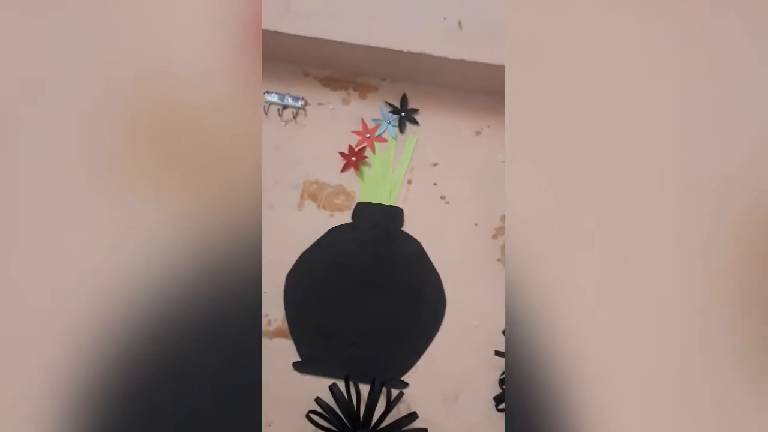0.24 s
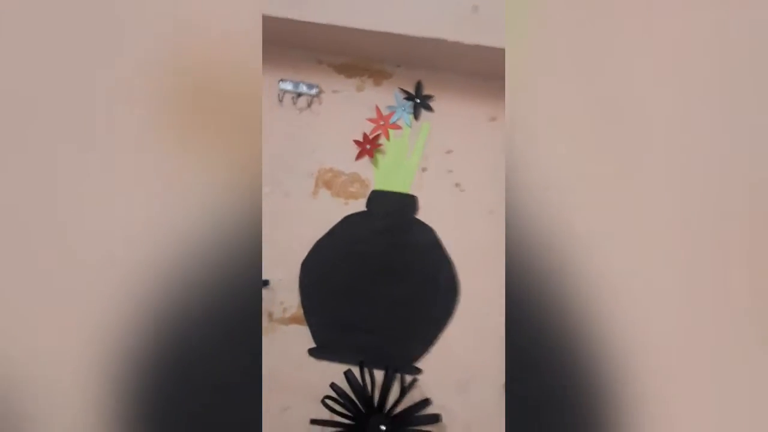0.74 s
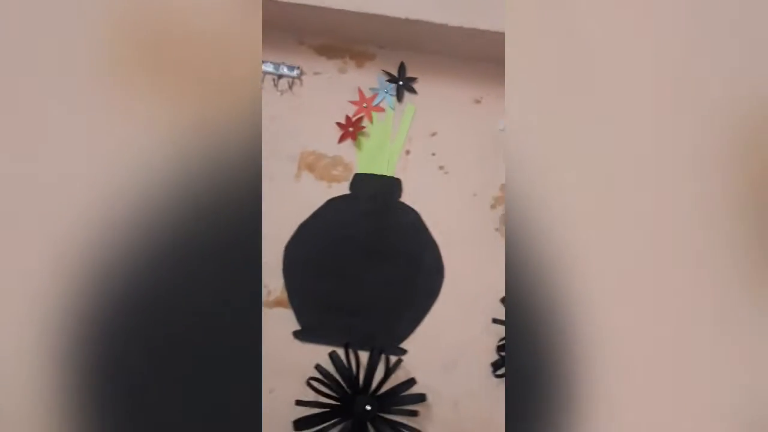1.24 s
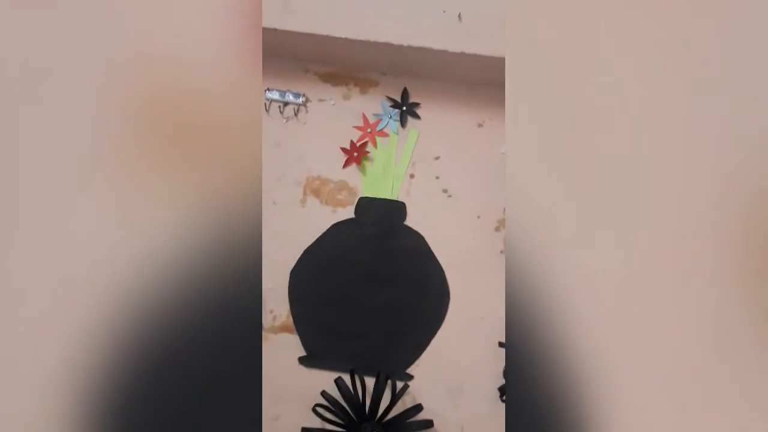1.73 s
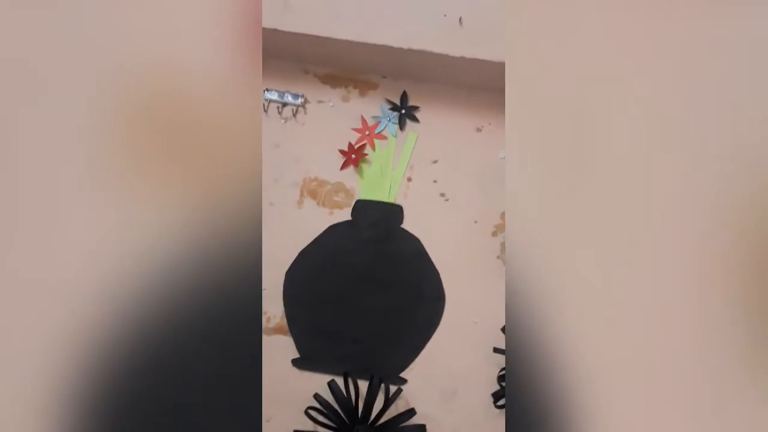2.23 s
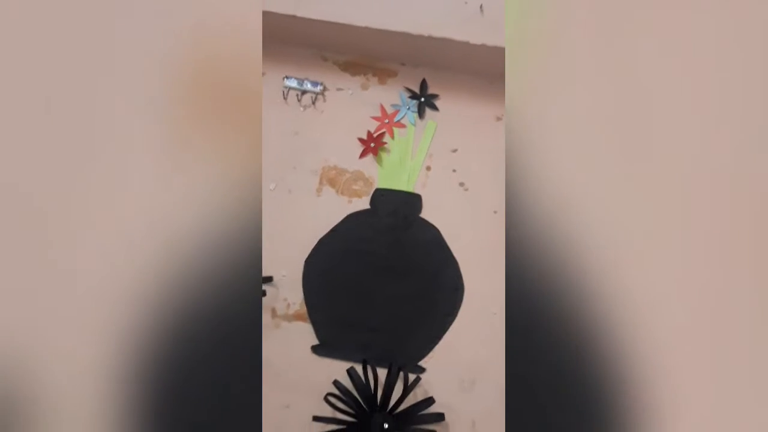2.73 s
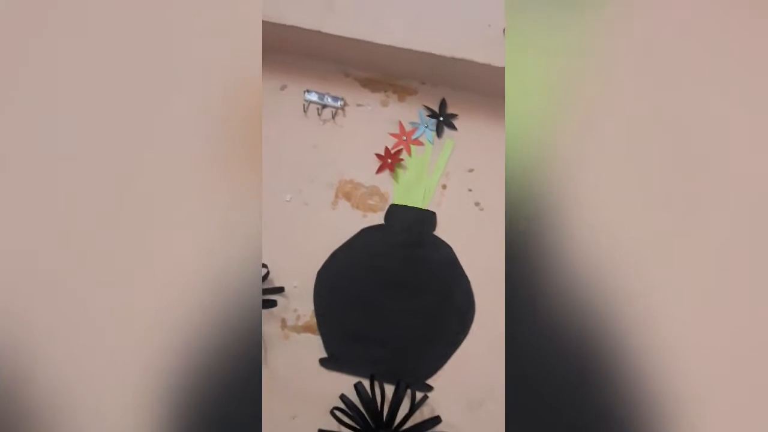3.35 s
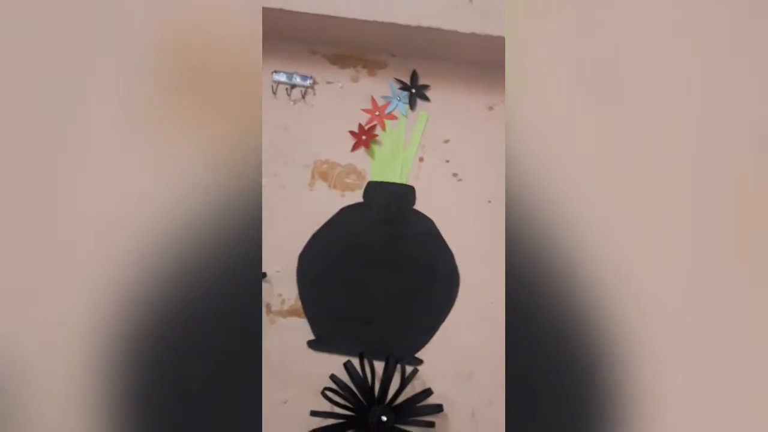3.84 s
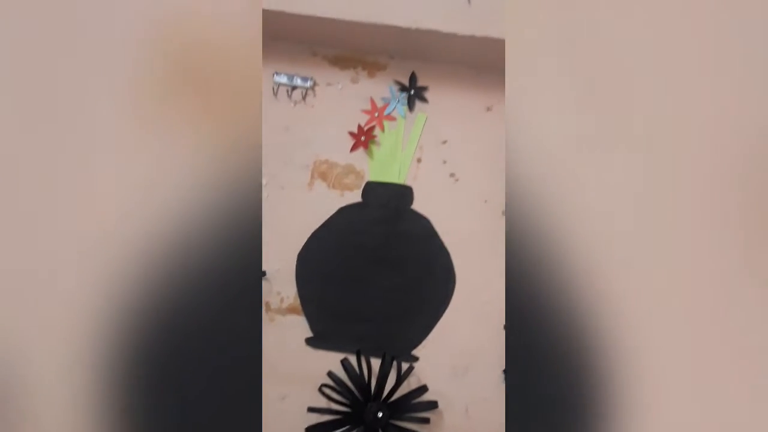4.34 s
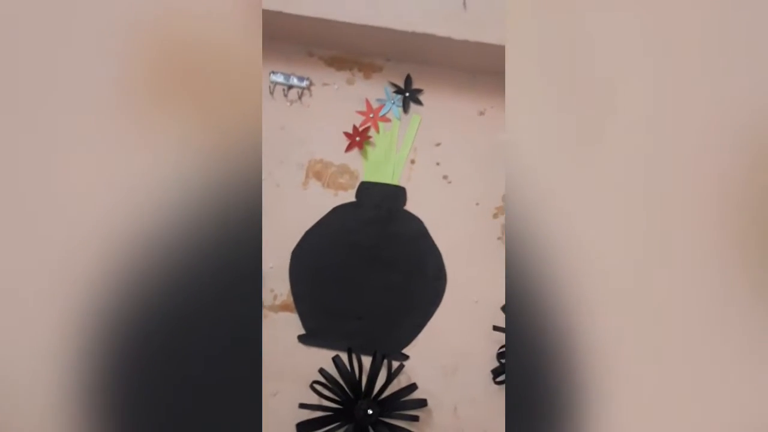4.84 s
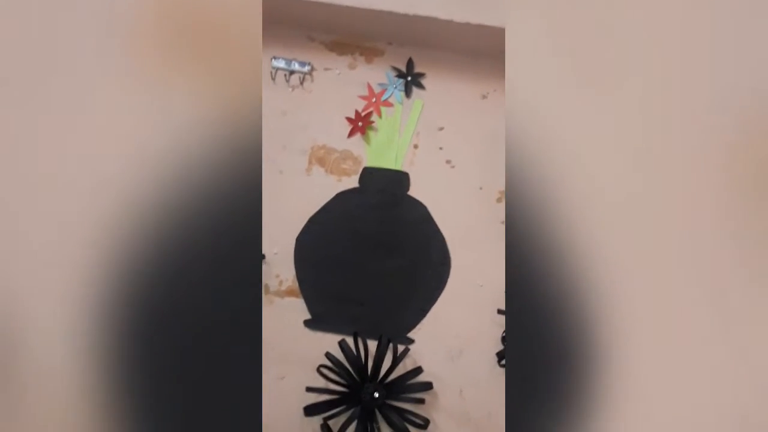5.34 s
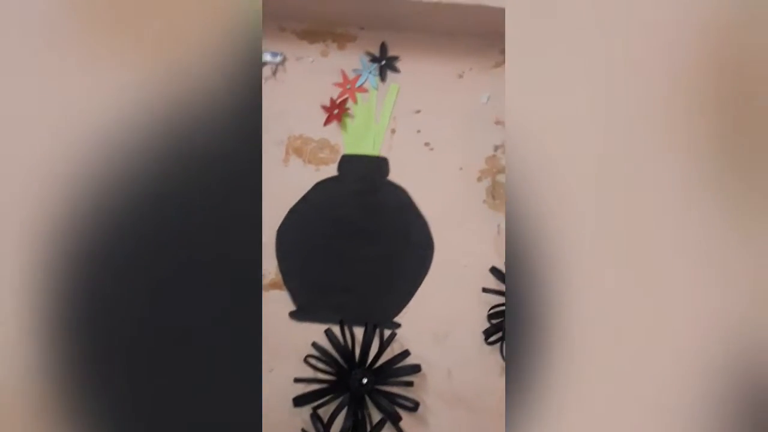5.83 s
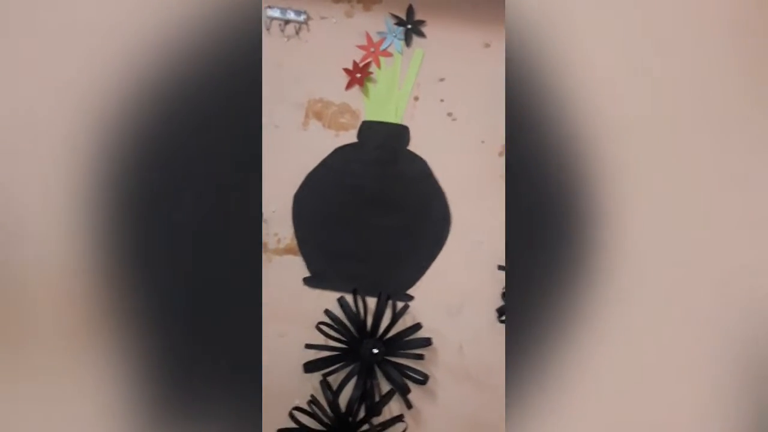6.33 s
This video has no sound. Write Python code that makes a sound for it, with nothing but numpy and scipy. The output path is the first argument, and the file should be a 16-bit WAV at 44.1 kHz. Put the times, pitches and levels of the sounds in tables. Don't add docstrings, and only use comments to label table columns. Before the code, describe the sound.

A stiff broom scratches a hard floor in a bare room, snaps sharply, then six hard, clipping wooden knocks ring off the walls.

```python
import sys
import numpy as np
from scipy import signal
from scipy.io import wavfile
from scipy.ndimage import uniform_filter1d

SR = 44100
rng = np.random.default_rng(int(sys.argv[2]) if len(sys.argv) > 2 else 0)


def pcm_store(signal):
    levels = np.round(np.clip(np.atleast_2d(signal), -1, 1) * 32767)
    wavfile.write(sys.argv[1], SR, levels.astype(np.int16).T)


def volts_from_db(level):
    exponent = np.asarray(level, float) / 20
    return 10 ** exponent


N = 289737

# pitch_hz, level_db per Hz
AIR_COLOUR = [(20, -17.5), (64, -21), (93, -3.5), (340, -3), (600, -3.5), (800, -9.5), (1400, -8.5),
              (2400, -17), (3400, -5.5), (4400, -18), (6700, -24.5), (8700, -21.5), (16000, -25)]
# time_s, level_db
STIR = [(0, -1.5), (.1, -1.5), (.6, 0.5), (.75, 2.5), (1.25, 1), (1.45, 0.5), (1.7, 1.5), (3.3, 2),
        (3.7, -3), (5.0, 1.5), (5.5, -1), (5.9, -6), (6.25, -5.5), (6.57, 4.5)]
# start_s, level_db, length_s
BUMPS = [
    (.3, -56, 0.13),
    (.72, -60.5, 0.062),
    (1.46, -55.5, 0.05),
    (1.94, -50.5, 0.15),
    (2.22, -56.5, 0.087),
]
# (after a short hold, each falls 60 dB in about 0.6 of
# ring_s)
ROOM_MODES = [(80.7, 3.5, 0.52), (127.7, -3, 0.28), (159.5, -3, 0.36), (192.4, -0.5, 0.37),
              (238, -1.5, 0.44), (325.2, -6, .3), (370.6, -7.5, 0.37), (426.5, -7.5, 0.52), (499, -9.5, .3),
              (567, -11.5, 0.25), (609, -14, .38), (670, -17.5, 0.27), (776, -23, 0.45),
              (1010, -21.5, 0.57)]

# peak_s, stroke_db, tips_fizz_db, rise_s, fall_s
SWEEPS = [(.17, -37.5, -42.5, 0.073, 0.13), (.23, -42.5, -56, .04, 0.066), (.38, -47, -50, 0.028, 0.099),
          (.5, -55, -59, .04, .1), (.64, -54, -56, .01, .07), (.78, -65, -52.5, .04, .05),
          (.91, -30, -40, 0.057, 0.28), (1.06, -26, -42, 0.06, 0.11), (1.37, -57, -61, 0.024, 0.1),
          (1.62, -30, -43.5, 0.096, .2), (1.82, -46, -52, .05, 0.17), (1.95, -35.5, -47, 0.11, 0.123),
          (2.02, -30, -43.5, 0.055, 0.099), (2.2, -59, -60, 0.067, 0.11), (2.88, -48, -53, 0.06, .07),
          (2.98, -48, -48.5, 0.03, .05), (4.41, -44, -55, 0.055, .05), (4.66, -38, -48, 0.08, 0.088),
          (4.97, -43.5, -58.5, .05, .06), (5.38, -49.5, -58, .05, 0.098), (5.6, -58, -63.5, 0.055, 0.067),
          (5.97, -53, -68, .05, .08), (6.47, -54, -70, .04, 0.18), (6.57, -33, -40.5, .1, .1)]
# pitch_hz, level_db per Hz
BRISTLE_COLOUR = [(400, -16.5), (700, -16.5), (1400, -20.5), (3400, -1.5), (5400, -5), (7000, -9.5),
                  (9000, -13.5), (12000, -19.5), (19000, -77.5)]
# pitch_hz, level_db per Hz
TIPS_COLOUR = [(4000, -15.5), (7500, -1.5), (9500, -4), (11000, -0.5), (13000, -2), (16000, -2.5)]
# start_s, peak_db
TICKS = [
    (.638, -54),
    (.7674, -43),
    (2.0144, -36),
    (2.9507, -9.5),
    (2.952, -9),
    (2.9538, -8),
    (2.9615, -18),
    (4.331, -33),
]
# pitch_hz, level_db per Hz
TICK_COLOUR = [(500, -36), (2000, -11), (3500, 0.5), (6000, -8), (9000, -4), (13000, 5), (16000, 1)]

# start_s, crack_peak_db, tail_db, brightness_db per octave, clack_centre_hz
KNOCKS = [
    (3.3557, 6.5, -11, -0.8, 3800),
    (3.7277, 2.5, -24, -1.5, 4290),
    (4.0723, 9.5, -17, 0.6, 5930),
    (4.423, 9.5, -20.5, 0.5, 5700),
    (4.744, 10.5, -17, 0.2, 5800),
    (5.0701, 11, -15.5, -1, 3540),
]
# boom_db, boom_tilt_db per octave, floor_thump_db, clack_db, crack_spread 0-1
LANDINGS = [(-8.5, -2.5, -60, 3, 0.1), (-16.5, 1.5, 2.2, 2.5, .95), (-13.5, 0.8, 0.5, 4.5, 0.7),
            (-14.5, 0, -2, 1.5, .98), (-12.5, 1.1, 1.5, 2, 0.95), (-11, 0.1, -.4, 7.5, .8)]
GRIPS = [0.99, 0.95, 0.95, .88, 0.87, .82]
# delay_s, level_db
CRACKS = [(0, 8), (.0009, -3), (.0021, 6), (.0033, 2.5)]
# delay_s, level_db
WALLS = [(.0075, -7.5), (0.0125, -9), (0.0145, -37), (.0195, -21), (0.026, -38.5)]
# pitch_hz, level_db per Hz
CRACK_COLOUR = [(150, -82), (300, 17), (600, -2.5), (900, -4.5), (1780, -1.5), (2900, 4.5), (6000, 9),
                (8500, 1.5), (16000, -9)]
# pitch_hz, level_db, t60_s
THUD = [(529, -4, 0.077), (636, -1.2, 0.057), (712, -8, 0.089), (235, -2.5, 0.11), (1043, -15.5, 0.024)]
# pitch_hz, level_db per Hz
FLOOR_COLOUR = [(25, -13.5), (45, -6.5), (75, 1), (100, -2.5), (140, -27), (400, -73)]
# pitch_hz, level_db per Hz
TAIL_COLOUR = [(500, -22), (780, -17.5), (1000, -18.5), (1400, -22.5), (2300, -17.5), (4000, -18.5),
               (6500, -19.5), (9000, -23.5), (16000, -33.5)]
# pitch_hz, level_db per Hz
LOW_TAIL_COLOUR = [(40, -45), (90, -24.5), (250, -5.5), (450, -6), (750, -16), (830, -42.5), (1500, -59)]
# pitch_hz, t60_s
TAIL_T60 = [(60, 0.38), (160, 0.64), (420, 0.51), (1100, 0.45), (2910, 0.41), (7680, 0.36)]
BOOM_EDGES_HZ = [110, 220, 300, 500]
BOOM_CENTRES_HZ = [80, 170, 250, 400, 620]
BOOM_SHAPE_DB = [-0.5, 3.3, 2.6, -1, 0.26]

# pitch_hz, level_db
MIC_COLOUR = [(20, -17), (70, -5), (110, -1), (2000, 1), (2900, 2), (4100, 2), (4600, 0), (7100, 1.5),
              (8100, -9.5), (16000, -3)]

HISS_DB, BUSTLE_DB = -51, -51.5
BUMP_HZ = 202.4
REST_DB, REST_FIZZ_DB = -47, -73
REST_BEND = 0.77
RISE_DB, FALL_DB = 13, 10.5
STROKE_LIFT_DB, TIPS_LIFT_DB = 3.8, 6
FLOOR_DB, FLOOR_RISE_S, FLOOR_T60_S = 1.5, 0.054, 0.27


def evened(x):
    return x / np.sqrt(np.mean(x ** 2) + 1e-20)


def read(points, hz):
    f, value = np.transpose(points)
    return np.interp(np.log(hz + 1), np.log(f + 1), value)


def curve(points):
    return np.interp(np.arange(N) / SR, *np.transpose(points))


def add(mix, s, sound):
    part = mix[round(s * SR):][:len(sound)]
    part += sound[:len(part)]


def causal(colour_db):
    log_gain = np.log(volts_from_db(colour_db(np.abs(np.fft.fftfreq(4096, 1 / SR)))))
    return np.fft.ifft(np.exp(np.conj(signal.hilbert(log_gain)))).real[:2048]


def noise(length, field_db, size, patchy_db):
    hop = size // 4
    frames = length // hop + 5
    hz = np.fft.rfftfreq(size, 1 / SR)[:, None]
    a, b, patches = rng.standard_normal((frames, len(hz), 3)).T
    patches = uniform_filter1d(patches, size=8, axis=0)
    patches = evened(uniform_filter1d(patches, size=12, axis=1))
    level_db = field_db(hz, np.arange(frames) * hop / SR) + patchy_db * patches
    return signal.istft((a + 1j * b) * volts_from_db(level_db), nperseg=size, noverlap=size - hop)[1][:length]


def resonate(x, hz, width):
    turn = np.exp(2j * np.pi * hz * np.arange(len(x)) / SR)
    r = np.exp(-np.pi * width / SR)
    return 2 * (turn * signal.lfilter([1 - r], [1, -r], x / turn)).real


def fall_db(t, t60, hold):
    return -60 * (np.sqrt(t ** 2 + hold ** 2) - hold) / t60


def fading(colour_db, length, size, hold):
    def field_db(hz, s):
        return colour_db(hz) + fall_db(s, read(TAIL_T60, hz), hold)
    return noise(length, field_db, size=size, patchy_db=-0.1)


def hiss():
    return volts_from_db(HISS_DB) * evened(noise(N, lambda hz, t: read(AIR_COLOUR, hz), size=1024, patchy_db=-0.1))


def far_bustle():
    rumble = noise(N, lambda hz, t: -0.01 * hz, size=2048, patchy_db=2.0)
    ring = sum(volts_from_db(0.73 * db) * resonate(rumble, hz, 28.4) for hz, db, t60 in ROOM_MODES)
    bustle = volts_from_db(BUSTLE_DB + curve(STIR)) * evened(ring)
    for s, db, length in BUMPS:
        t = np.arange(0, length, 1 / SR)
        swell = signal.windows.tukey(len(t), 0.6)
        add(bustle, s, volts_from_db(db + 8.5) * np.sin(2 * np.pi * BUMP_HZ * t) * swell)
    return bustle


def strokes(column, lift_db):
    t = np.arange(0, N, 64) / SR
    rows = np.array(SWEEPS)[:, :, None]
    late = t - rows[:, 0]
    risen = np.minimum(late, 0) / rows[:, 3]
    fallen = np.maximum(late, 0) / rows[:, 4]
    shape_db = -RISE_DB * risen ** 2 - FALL_DB * fallen - lift_db * fallen ** 2
    power = (volts_from_db(rows[:, column] + shape_db) ** 2).sum(0)
    return np.interp(np.arange(N) / SR, t, power)


def bristle_tick():
    t = np.arange(3000) / SR
    shape = np.exp(-t / 0.00033) + 0.029 * np.exp(-t / 0.019)
    tick = signal.oaconvolve(rng.standard_normal(len(t)) * shape, causal(lambda hz: read(TICK_COLOUR, hz)))
    return tick / abs(tick).max()


def broom():
    rest = volts_from_db(curve(STIR))
    push = strokes(column=1, lift_db=STROKE_LIFT_DB)
    slack = (volts_from_db(REST_DB) * rest) ** 2
    tips = np.sqrt(strokes(column=2, lift_db=TIPS_LIFT_DB) + (volts_from_db(REST_FIZZ_DB) * rest) ** 2)
    bend = REST_BEND + (1 - REST_BEND) * push / (push + slack)
    sample_t = np.arange(N) / SR

    def bent_db(hz, t):
        return read(BRISTLE_COLOUR, hz / np.interp(t, sample_t, bend))
    body = noise(N, bent_db, size=256, patchy_db=0.5)
    fizz = noise(N, lambda hz, t: read(TIPS_COLOUR, hz), size=256, patchy_db=1.0)
    contact = uniform_filter1d(rng.exponential(1, N) ** 2, size=60)
    grit = volts_from_db(0.41 * evened(contact - 2))
    scratch = volts_from_db(-3) * np.sqrt(push + slack) * evened(body)
    out = grit * (scratch + volts_from_db(8.5) * tips * evened(fizz))
    for s, db in TICKS:
        add(out, s, volts_from_db(db) * bristle_tick())
    return out


def coloured(points, hz, tilt_db, clack_hz, clack_db):
    hump = np.exp(-(np.log2((hz + 1) / clack_hz) / 0.3) ** 2)
    return read(points, hz) + tilt_db * np.log2((hz + 200) / 4000) + clack_db * hump


def booms(boom_db, tilt_db, thump_db):
    tilted = boom_db + np.array(BOOM_SHAPE_DB) + tilt_db * np.log2(np.array(BOOM_CENTRES_HZ) / 250)
    return tilted + thump_db * (np.arange(len(tilted)) == 0)


def cracks_and_echoes(length, colour, spread):
    blow = np.zeros(length)
    add(blow, 0, 0.034 * rng.standard_normal(130) * np.linspace(0, 1, 130) ** 2)
    t = np.arange(200) / SR
    for delay, db in [(d * spread, db) for d, db in CRACKS] + WALLS:
        burst = rng.choice([-1., 1.], 200) * rng.uniform(0.33, 1, 200)
        burst *= np.exp(-t / (0.00035 + 0.16 * delay))
        add(blow, 0.0032 + delay, volts_from_db(db + 0.34 * rng.standard_normal()) * burst)
    blow = signal.oaconvolve(blow, causal(lambda hz: coloured(CRACK_COLOUR, hz, *colour)))[:length]
    return blow / abs(blow).max()


def diffuse_tail(t, colour, tail_db):
    tail = fading(lambda hz: coloured(TAIL_COLOUR, hz, *colour), len(t), size=256, hold=0.02)
    return tail * volts_from_db(tail_db) * (1 - np.exp(-t / 0.011)) / tail[:len(t) // 6].std()


def low_tail(t, booms_db):
    feed = list(zip(BOOM_CENTRES_HZ, booms_db))
    low = fading(lambda hz: read(LOW_TAIL_COLOUR, hz) + read(feed, hz), len(t), size=512, hold=0.023)
    return volts_from_db(-2.0) * low * (1 - np.exp(-t / 0.018))


def floor_flex(t, booms_db):
    flex = evened(noise(len(t), lambda hz, s: read(FLOOR_COLOUR, hz), size=2048, patchy_db=0.2))
    level = volts_from_db(booms_db[0] + FLOOR_DB + fall_db(t, FLOOR_T60_S, 0.12))
    return level * flex * (1 - np.exp(-(t / FLOOR_RISE_S) ** 2))


def handle_thud(t, booms_db, grip):
    return sum(volts_from_db(booms_db[-1] + 4.0 + db - 60 * t / t60) * np.sin(2 * np.pi * hz * grip * t)
               for hz, db, t60 in THUD)


def room_boom(t, booms_db):
    out = np.zeros(len(t))
    for hz, db, t60 in ROOM_MODES:
        a, b, c = rng.random(3)
        build = 1 - np.exp(-(t * (hz + 60) / 6.3) ** 1.6)
        neighbour = np.sin(2 * np.pi * (hz * (0.92 + 0.16 * a) * t + b))
        pair = np.sin(2 * np.pi * (hz * t + c)) + 0.35 * neighbour
        feed_db = booms_db[np.searchsorted(BOOM_EDGES_HZ, hz)]
        out += volts_from_db(feed_db + db - 2.0 + fall_db(t, 0.59 * t60, 0.12)) * build * pair
    return out


def knock(crack_db, tail_db, colour, booms_db, spread, grip):
    t = np.arange(int(0.6 * SR)) / SR
    out = volts_from_db(crack_db - 1.5) * cracks_and_echoes(len(t), colour, spread)
    ringing = diffuse_tail(t, colour, tail_db) + low_tail(t, booms_db) + floor_flex(t, booms_db)
    ringing += handle_thud(t, booms_db, grip) + room_boom(t, booms_db)
    add(out, 0.003, ringing)
    return out


def scene():
    mix = hiss() + far_bustle() + broom()
    for hit, landing, grip in zip(KNOCKS, LANDINGS, GRIPS):
        s, crack_db, tail_db, tilt_db, clack_hz = hit
        *boom, clack_db, spread = landing
        colour = (tilt_db, clack_hz, clack_db)
        add(mix, s - 0.003, knock(crack_db, tail_db, colour, booms(*boom), spread, grip))
    return mix[None]


def gain_control(x):
    blocks = x[0, :N // 256 * 256].reshape(-1, 256)
    power_db = 10 * np.log10((blocks ** 2).mean(1) + 1e-12)
    cut_db = np.zeros(len(power_db) + 1)
    for k, wanted_db in enumerate(np.clip(0.5 * (power_db + 31.5), 0, 12.0)):
        if wanted_db > cut_db[k]:
            cut_db[k + 1] = cut_db[k] + 0.032 * (wanted_db - cut_db[k])
        else:
            cut_db[k + 1] = max(cut_db[k] - 0.04, 0)
    return x * volts_from_db(-np.interp(np.arange(N), np.arange(len(cut_db)) * 256, cut_db))


def top_cut(x):
    return signal.sosfilt(signal.butter(12, 16720, fs=SR, output="sos"), x)


def record(dry):
    x = signal.oaconvolve(dry, causal(lambda hz: read(MIC_COLOUR, hz))[None])[:, :N]
    x = signal.oaconvolve(x, signal.firwin(255, 15700, window=("kaiser", 7), fs=SR)[None], "same")
    x = np.clip(gain_control(x), -1, 1)
    x = signal.oaconvolve(x, signal.firwin(127, 16800, fs=SR)[None], "same")
    return top_cut(np.clip(x, -1, 1))


dry = scene()
out = record(dry)
pcm_store(out)
```